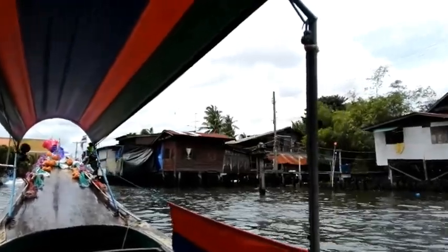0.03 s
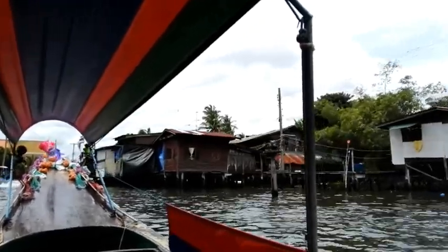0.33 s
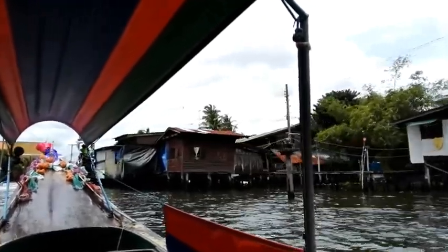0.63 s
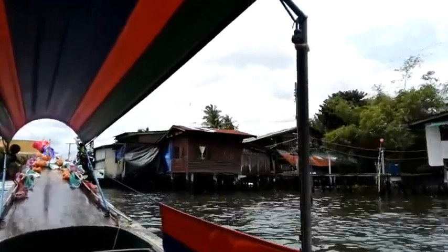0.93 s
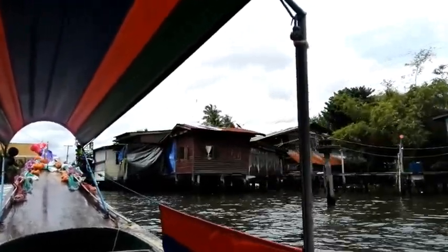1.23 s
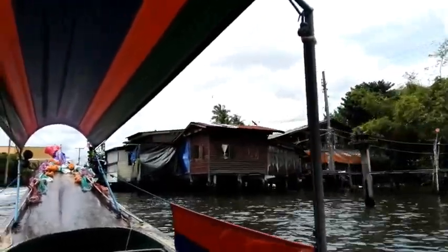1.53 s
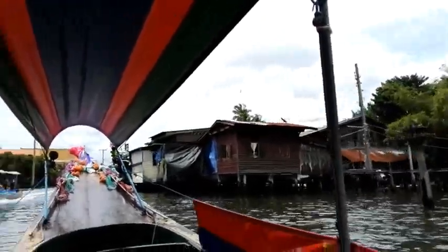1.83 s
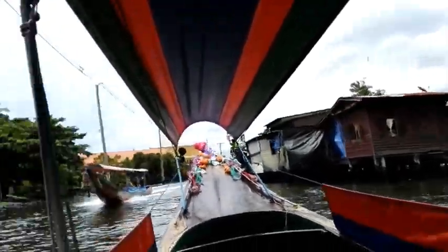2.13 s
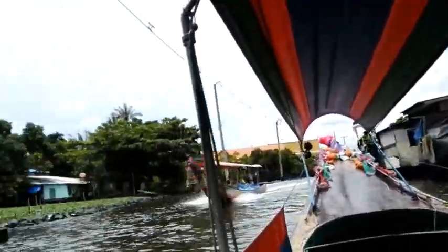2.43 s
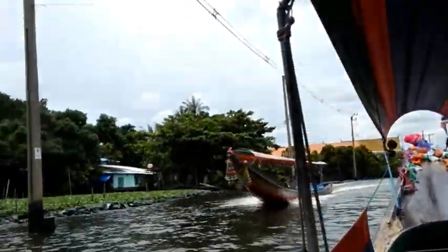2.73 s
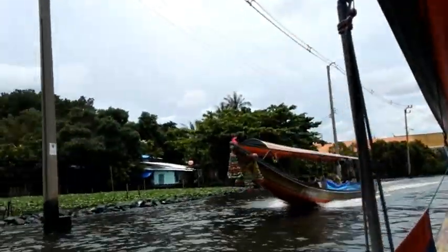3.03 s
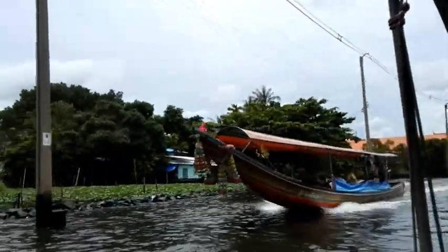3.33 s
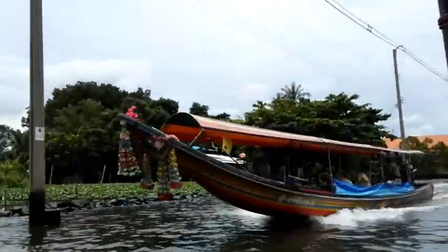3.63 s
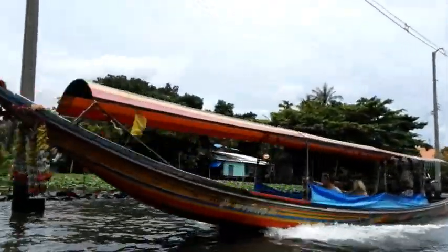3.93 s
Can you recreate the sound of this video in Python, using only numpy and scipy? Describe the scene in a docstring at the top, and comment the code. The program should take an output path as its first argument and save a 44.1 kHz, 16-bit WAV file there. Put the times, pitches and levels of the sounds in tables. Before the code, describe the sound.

A longtail boat's engine buzzes loudly, then drops back as wind rumbles on the onboard microphone and canal water washes past. Another boat comes up on the left, its engine roaring dully and its bow spray growing louder.

```python
"""A longtail boat's engine, heard on board along a canal, drones and rasps, then eases off.
Its periodic firing gives low harmonics and a buzz of exhaust puffs, and the wooden hull resonates.
Turbulent wind buffets the two ports of the microphone, while foam and droplets rush along the hull.
A second boat comes up on the left, its engine a dull roar and its bow spray a growing hiss."""
import sys
import numpy as np
from scipy import signal
from scipy.fft import rfft, irfft
from scipy.io import wavfile
from scipy.ndimage import uniform_filter1d

SR = 44100
rng = np.random.default_rng(int(sys.argv[2]) if len(sys.argv) > 2 else 0)


def int16_out(signal):
    """Quantize to a 16-bit WAV file."""
    q = np.round(np.clip(np.atleast_2d(signal).T, -1, 1) * 32767)
    wavfile.write(sys.argv[1], SR, q.astype(np.int16))


N = 176400
T = np.arange(N) / SR
HZ = np.fft.rfftfreq(N, 1 / SR)

# Each row: time in seconds, engine cycles per second.
ENGINE_SPEED = [(0, 34.45), (.4, 32.48), (.8, 31.35), (1.1, 29.76), (1.6, 31.02), (2.1, 29.43),
                (2.7, 29.95), (4, 28.53)]
# Each row: time in seconds, gain of the whole engine in dB.
ENGINE_EFFORT = [(0, 0.5), (.35, 1.5), (.6, 2), (.73, 0.5), (.82, -3), (.93, -15), (1.1, -14), (1.6, -7),
                 (2.6, -11.5), (3.3, -8.5), (4, -8)]
# Each row: multiple of the cycle rate, relative level in dB.
ENGINE_ORDERS = [(2, -36.5), (3, -38.5), (4, -41.5), (8, -51.5), (12, -48)]
# Each row: frequency in Hz, relative spectral density in dB.
RASP_SPECTRUM = [(100, -7), (250, 2.5), (400, 1), (520, 1), (700, 2), (850, 2), (1200, 4), (1650, -3.5),
                 (2000, -1.5), (2750, -5), (4000, -25), (8000, -26), (15000, -53)]
# Each row: frequency in Hz, coherence of the ports from 0 to 1, left phase lead in radians.
RASP_COHERENCE = [(150, .7, .3), (550, .7, 2.5), (850, .2, 5), (1150, .7, 6), (1500, .55, 6.2),
                  (2000, .45, 7.3), (2700, .3, 5.7), (4000, .1, 7)]
def engine():
    """Periodic firing makes a harmonic series: drone and rasp follow one speed and one effort."""
    jitter, rasp_db, sputter_db = .004, -33, 2
    cycles = np.cumsum(curve(ENGINE_SPEED) * (1 + jitter * wander(18.4))) / SR
    drone = 0
    for order, db in ENGINE_ORDERS:
        gain = amp(db + .19 * wander(11))
        drone += gain * unit(np.sin(2 * np.pi * (order * cycles + rng.random())))
    sputter = amp(rasp_db + sputter_db * wander(40))
    rasp = blend(exhaust(cycles, noise_share=.42), RASP_COHERENCE)
    rasp = colour(rasp, RASP_SPECTRUM, pan_db=2)
    return amp(curve(ENGINE_EFFORT)) * (drone + sputter * rasp)


def exhaust(cycles, noise_share):
    """Pulsating flow: an uneven waveform repeats each cycle, and noise puffs out twice a cycle."""
    harmonics = rng.uniform(.1, 1, (2, 301)) * np.exp(2j * np.pi * rng.random((2, 301)))
    waveforms = irfft(harmonics, 4096)
    buzz = np.array([np.interp(cycles % 1, np.linspace(0, 1, len(w)), w) for w in waveforms])
    puffs = (.5 + np.exp(-(2 * cycles % 1))) * rng.standard_normal((2, N))
    return np.sqrt(1 - noise_share) * unit(buzz) + np.sqrt(noise_share) * unit(puffs)


# Each row: time in seconds, level in dB.
HULL_LEVEL = [(0, -51), (1.05, -54), (1.75, -45), (2.9, -45), (4, -53)]
def hull_boom():
    """Resonance: shaken unevenly, one mode of the wooden hull passes a narrow band, a low burble."""
    mode_hz, half_width_hz = 240, 32
    shaking = rfft(rng.standard_normal(N))
    ring = irfft(shaking / (1 + ((HZ - mode_hz) / half_width_hz) ** 2), N)
    return amp(curve(HULL_LEVEL)) * unit(ring)


# Each row: time in seconds, level of the rumble in dB.
WIND_LEVEL = [(0, -28), (.3, -30), (.62, -30.5), (.78, -32), (.82, -37.5), (.98, -35.5), (1.07, -45),
              (1.16, -33.5), (1.36, -39), (1.6, -37), (2.15, -39), (2.33, -37), (2.6, -36), (3.1, -39),
              (3.45, -44.5), (3.68, -38), (4, -37.5)]
# Each row: frequency in Hz, relative spectral density in dB.
RUMBLE_SPECTRUM = [(10, -20), (25, -4), (45, 4), (62, 10.5), (80, 5.5), (130, 3), (200, -5.5), (400, -22),
                   (1200, -35), (4000, -71)]
FLUTTER_SPECTRUM = [(40, -23), (100, -20), (150, 2.5), (245, -0.5), (310, -3), (390, 0.5), (520, -14),
                    (1200, -13), (4000, -62)]
# Each row: frequency in Hz, coherence of the ports from 0 to 1, left phase lead in radians.
WIND_COHERENCE = [(60, .965, 0), (130, .76, 0), (250, .45, 0), (400, .1, 0)]
def wind():
    """Turbulent pressure at the ports makes an even rumble with a lumpy flutter above it."""
    flutter_db, lump_db = -5.5, 6
    flutter = colour(turbulence(WIND_COHERENCE), FLUTTER_SPECTRUM)
    lumps = amp(lump_db * np.minimum(wander(39.2), 2))
    rumble = colour(turbulence(WIND_COHERENCE), RUMBLE_SPECTRUM)
    return amp(curve(WIND_LEVEL)) * (rumble + amp(flutter_db) * unit(flutter * lumps))


def turbulence(coherence):
    """Large eddies span both ports, so their noise is most alike at low frequencies."""
    return blend(rng.standard_normal((2, N)), coherence)


# Each row: centre in seconds, half length in seconds, level in dB, cutoff in Hz, left over right in dB.
EDDIES = [(0.041, 0.0065, -18.5, 295, 2), (0.027, 0.011, -26, 1110, 14), (0.217, 0.0067, -19, 1750, 19),
          (0.378, 0.0083, -30, 1510, 6), (0.412, 0.028, -24, 346, 8), (.416, 0.014, -20, 1900, 11),
          (0.598, 0.026, -22.5, 160, 0), (0.686, 0.0055, -29, 1320, -6), (0.773, 0.011, -26.5, 199, 5),
          (1.157, 0.018, -33, 340, -7), (1.209, 0.0063, -28, 257, -11), (1.289, 0.019, -32.5, 225, -6),
          (1.408, 0.0051, -27, 298, -6), (1.629, 0.0075, -28, 278, -1.5), (1.844, 0.0055, -31, 395, 4),
          (1.958, 0.009, -38, 380, -7), (2.334, 0.009, -28, 274, 4), (2.443, 0.0073, -24.5, 342, 1),
          (2.466, 0.0093, -34, 377, -5), (3.566, 0.0071, -26, 385, 10), (3.584, 0.0069, -21, 404, 13),
          (3.605, 0.023, -28.5, 1129, 13)]
# Each row: frequency in Hz, coherence of the ports from 0 to 1, left phase lead in radians.
EDDY_COHERENCE = [(70, .97, 0), (300, .6, 0)]
def gusts():
    """Passing eddies make ragged pressure bursts; the fast ones reach up into a one-sided crackle."""
    floor_hz, knee_hz, side_hz, lag_s = 75, 300, 300, .0007
    body = HZ ** 2 / (HZ ** 2 + floor_hz ** 2) / np.sqrt(1 + HZ / knee_hz)
    sided = HZ ** 2 / (HZ ** 2 + side_hz ** 2)  # the bass stays central
    air = rfft(turbulence(EDDY_COHERENCE))
    tearing = amp(2.5 * np.minimum(wander(110), 1))
    out = np.zeros((2, N))
    for centre_s, half_s, db, cutoff_hz, pan_db in EDDIES:
        delay_s = sided * np.array([[0], [lag_s * np.sign(pan_db)]])  # the nearer port is hit first
        place = np.exp(-2j * np.pi * HZ * delay_s) * pan(pan_db * sided)
        eddy = irfft(air * body * place / (1 + (HZ / cutoff_hz) ** 5), N)
        eddy = np.roll(eddy, rng.integers(N), axis=1)
        out += amp(db) * burst(tearing * eddy, centre_s, half_s)
    return out


# Each row: time in seconds, level in dB.
WASH_LEVEL = [(0, -37), (.35, -40), (.6, -37), (1.1, -35), (1.4, -37), (1.85, -36.5), (2.2, -39),
              (2.7, -38), (3.1, -41), (4, -37.5)]
SPRAY_LEVEL = [(0, -47), (.13, -39.5), (.22, -42), (.36, -36.5), (.6, -45.5), (.8, -43), (1.05, -60)]
# Each row: frequency in Hz, relative spectral density in dB.
WASH_SPECTRUM = [(60, -2), (250, -4), (550, -1.5), (850, 1), (1300, 3), (1800, 4.5), (2500, 0), (3400, 3),
                 (4600, -3), (7000, -5.5), (10000, -10.5), (14000, -16.5)]
SPRAY_SPECTRUM = [(1000, -23), (3500, -3), (6000, -5), (10000, -10.5), (14000, -19)]
# Each row: frequency in Hz, left over right in dB.
WASH_PAN = [(200, 11), (600, -4), (1300, 5), (2300, 5), (3400, 8.5), (5000, 1), (8000, 1.5)]
# Each row: frequency in Hz, coherence of the ports from 0 to 1, left phase lead in radians.
WASH_COHERENCE = [(800, .12, 0), (1250, .62, -.3), (1900, .15, .9), (2300, .3, 1.6), (3400, .1, .5)]
def hull_water():
    """Flow noise: a broadband wash runs along the hull, and brighter spray spurts off the bow."""
    wash = colour(blend(water(), WASH_COHERENCE), WASH_SPECTRUM, read(WASH_PAN, HZ))
    spray = colour(water(), SPRAY_SPECTRUM)
    return amp(curve(WASH_LEVEL)) * wash + amp(curve(SPRAY_LEVEL)) * spray


def water():
    """Random events add up to noise: foam churns in drifting patches, and droplets burst as impulses."""
    patch_db, swell_db, flicker_db = 1.31, .25, .6
    drops_per_s, drop_spread_db, drop_db = 2800, 1.5, -17
    bands = signal.stft(rng.standard_normal((2, N)), nperseg=512)[2]
    patches = rng.standard_normal(bands.shape[1:])
    for axis in (0, 1):  # smooth over frequency, then time
        patches = uniform_filter1d(patches, size=8, axis=axis)
    foam = signal.istft(bands * amp(patch_db * unit(patches)), nperseg=512)[1][:, :N]
    impulses = (rng.random((2, N)) < drops_per_s / SR) * rng.choice([-1, 1], (2, N))
    drops = impulses * amp(drop_spread_db * np.minimum(rng.exponential(1, (2, N)), 5))
    surge = amp(swell_db * wander(2.3) + flicker_db * wander(47))
    return (unit(foam) + amp(drop_db) * unit(drops)) * surge


# Each row: time in seconds, level in dB.
ROAR_LEVEL = [(1.4, -61), (1.88, -52), (2, -41), (2.35, -39), (2.65, -42.5), (2.78, -52), (3.1, -51),
              (3.8, -50.5), (3.92, -37.5), (4, -38.5)]
BOW_LEVEL = [(0, -59), (2.1, -47), (2.6, -40.5), (3.1, -41.5), (3.35, -37.5), (3.6, -35), (3.9, -34),
             (4, -34)]
# Each row: frequency in Hz, relative spectral density in dB.
ROAR_SPECTRUM = [(100, -4.5), (380, 2.5), (600, 0.5), (1000, -0.5), (1350, 4.5), (1900, 2.5), (2600, -5.5),
                 (5000, -10), (14000, -54)]
BOW_SPECTRUM = [(300, -4), (700, -12), (1020, -5.5), (1450, 2), (2400, 3.5), (4000, 3.5), (6500, 3),
                (9000, 1), (11000, -4.5), (14000, -12)]
# Each row: frequency in Hz, left over right in dB.
BOW_PAN = [(1000, 1.5), (4000, 7.8), (13000, 5.3)]
# Each row: frequency in Hz, coherence of the ports from 0 to 1, left phase lead in radians.
ROAR_COHERENCE = [(800, .1, -.4), (1300, .8, 0), (1900, .35, .4), (2400, 0, 0)]
def second_boat():
    """A level difference places a rough engine and the growing hiss of its bow wave on the left."""
    cycle_hz, jitter = 57.3, .024
    cycles = np.cumsum(cycle_hz * (1 + jitter * wander(7.1))) / SR
    roar_gain = amp(curve(ROAR_LEVEL) + 2.1 * wander(20))
    roar = blend(exhaust(cycles, noise_share=.99), ROAR_COHERENCE)
    roar = colour(roar, ROAR_SPECTRUM, pan_db=4.5)
    bow_wave = colour(water(), BOW_SPECTRUM, read(BOW_PAN, HZ))
    return roar_gain * roar + amp(curve(BOW_LEVEL)) * bow_wave


# Each row: centre in seconds, half length in seconds, level in dB.
BREAKING_WAVES = [(1.843, 0.013, -36.5), (1.978, 0.011, -42), (3.506, 0.011, -35), (3.9, 0.022, -34),
                  (3.977, 0.0084, -37)]
# Each row: frequency in Hz, relative spectral density in dB.
SPLASH_SPECTRUM = [(300, -15), (1200, 10), (2000, 8.5), (3600, 4.5), (6000, 4), (14000, -28)]
def splashes():
    """Small waves breaking at the second boat's bow radiate short noise transients on the left."""
    foam = colour(water(), SPLASH_SPECTRUM, pan_db=5.5)
    return sum(amp(db) * burst(foam, centre_s, half_s) for centre_s, half_s, db in BREAKING_WAVES)


def amp(db):
    """Converts decibels to an amplitude ratio."""
    return 10 ** (np.asarray(db) / 20)


def unit(x):
    """Normalises to rms 1."""
    return x / np.sqrt(np.mean(abs(x) ** 2) + 1e-20)


def read(points, hz):
    """Interpolates a table over log frequency."""
    f, value = np.transpose(points)
    return np.interp(np.log(hz + 1), np.log(f + 1), value)


def curve(points):
    """Interpolates a table over time."""
    return np.interp(T, *np.transpose(points))


def pan(db):
    """Splits a level difference into left and right gains."""
    return amp(np.array([[.5], [-.5]]) * db)


def colour(x, spectrum, pan_db=0):
    """Filtering gives a stereo sound its spectrum and place, at rms 1."""
    return unit(irfft(rfft(x) * amp(read(spectrum, HZ)) * pan(pan_db), N))


def blend(x, coherence):
    """Partial coherence: the right channel takes a share of the left and a phase lag, band by band."""
    left, right = rfft(x)
    hz, *columns = np.transpose(coherence)
    likeness, lead = (read(np.c_[hz, column], HZ) for column in columns)
    right = likeness * left + np.sqrt(1 - likeness ** 2) * right
    return irfft(np.array([left, right * np.exp(-1j * lead)]), N)


def wander(hz):
    """Low-passed noise fluctuates at rates up to about hz, at rms 1."""
    return unit(irfft(rfft(rng.standard_normal(N)) * (HZ > 0) / (1 + (HZ / hz) ** 4), N))


def burst(noise, centre_s, half_s):
    """An envelope swells and dies, leaving the energy of rms 1 held for twice half_s."""
    envelope = np.exp(-(abs(T - centre_s) / half_s) ** 1.4)
    return unit(envelope * noise) * np.sqrt(2 * half_s * SR / N)


def scene():
    """Superposition: the pressures from both boats, the wind and the water add."""
    return engine() + hull_boom() + wind() + gusts() + hull_water() + second_boat() + splashes()


# Each row: frequency in Hz, left over right in dB.
PORT_BALANCE = [(5000, 0), (7000, -3), (10000, -7.5), (13500, -11.5)]
def record(dry):
    """Frequency response of the microphone: the left port is duller, and both are band-limited."""
    heard = irfft(rfft(dry) * pan(read(PORT_BALANCE, HZ)), N)
    low_pass = signal.firwin(801, cutoff=14300, window=("kaiser", 9), fs=SR)
    return signal.oaconvolve(heard, low_pass[None], "same")


dry = scene()
out = record(dry)
int16_out(out)
```